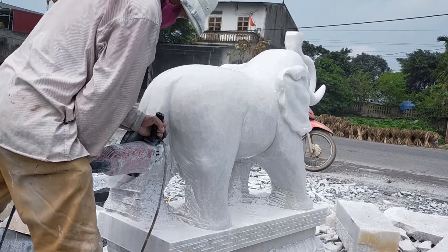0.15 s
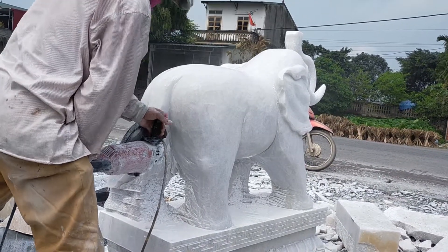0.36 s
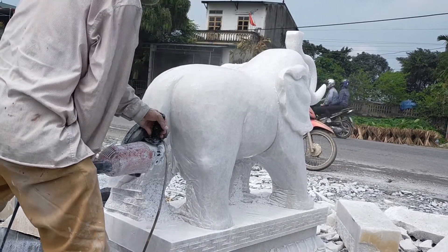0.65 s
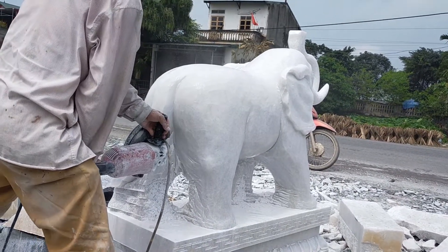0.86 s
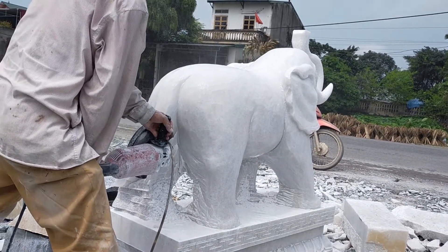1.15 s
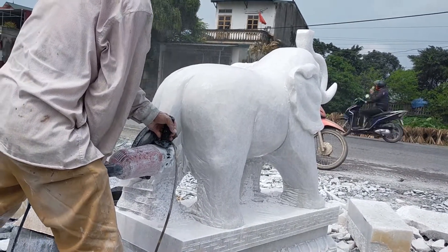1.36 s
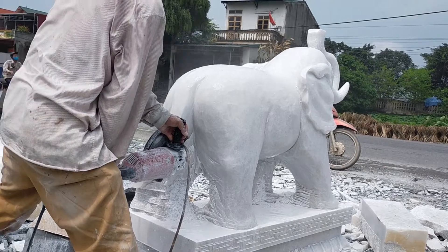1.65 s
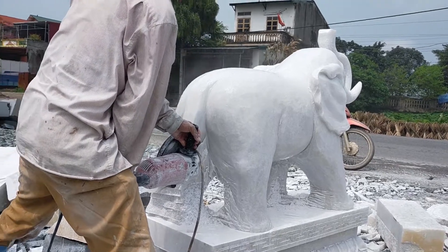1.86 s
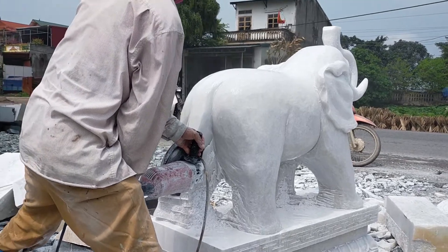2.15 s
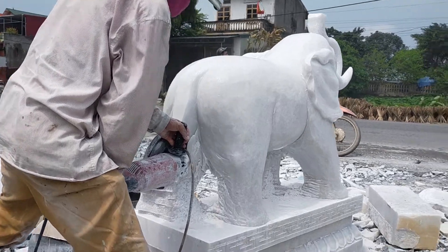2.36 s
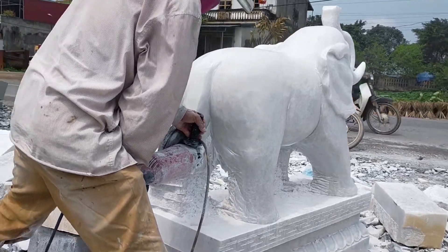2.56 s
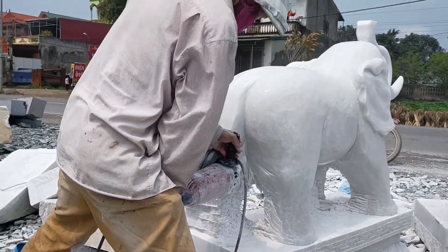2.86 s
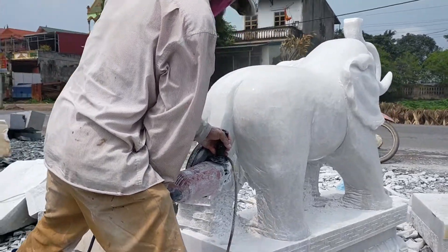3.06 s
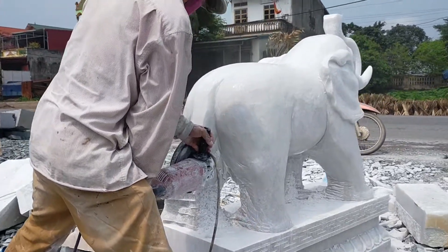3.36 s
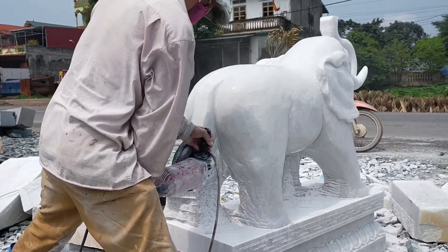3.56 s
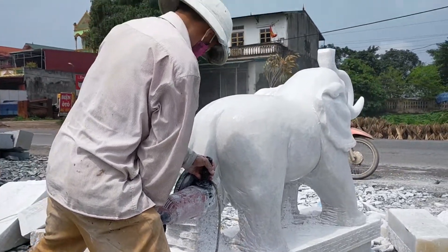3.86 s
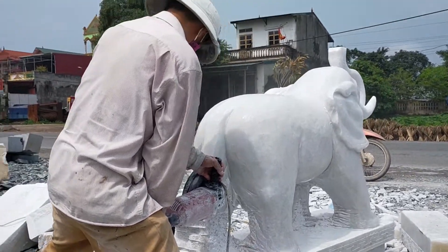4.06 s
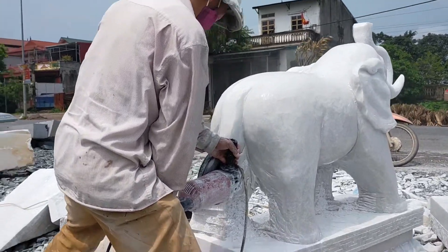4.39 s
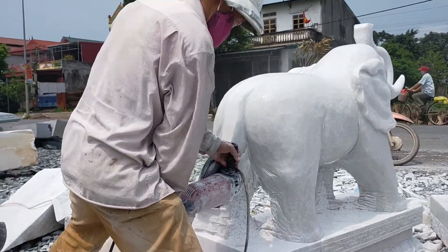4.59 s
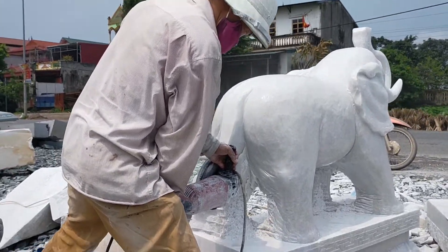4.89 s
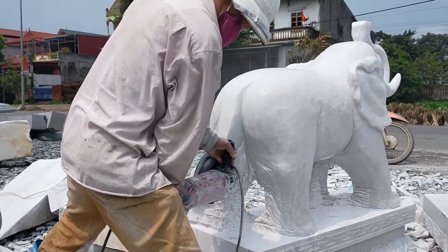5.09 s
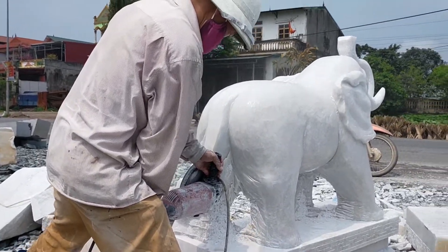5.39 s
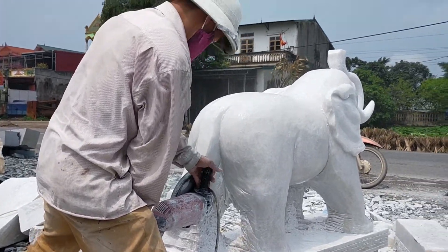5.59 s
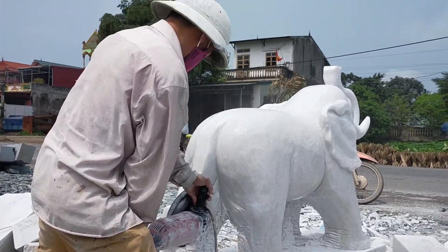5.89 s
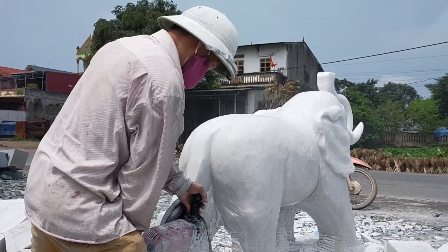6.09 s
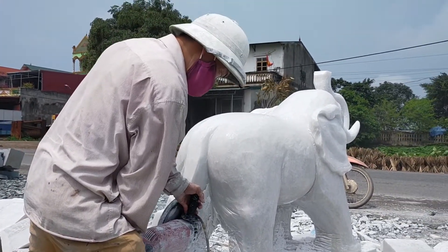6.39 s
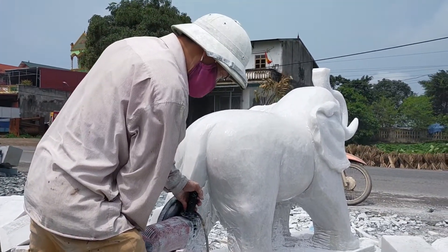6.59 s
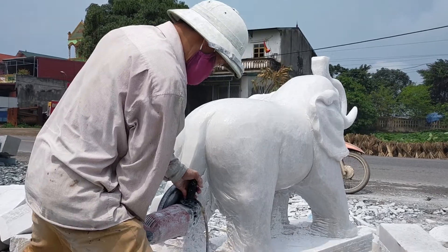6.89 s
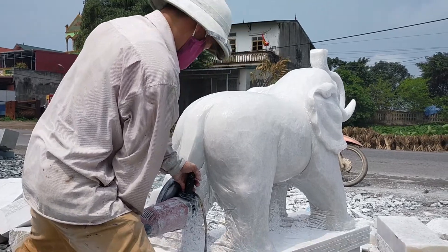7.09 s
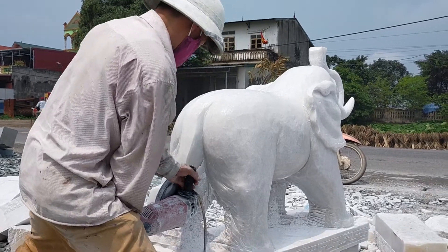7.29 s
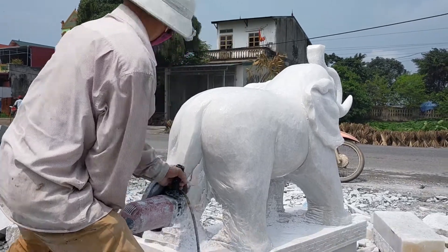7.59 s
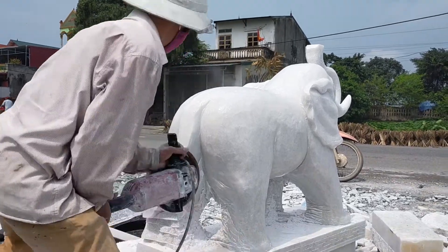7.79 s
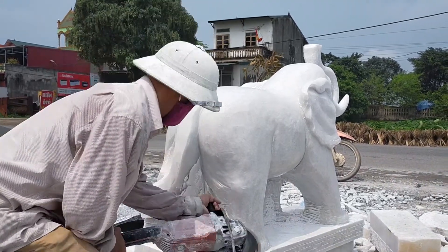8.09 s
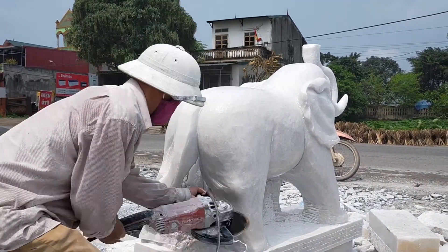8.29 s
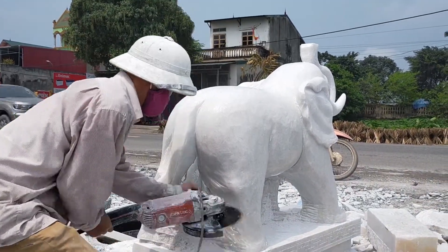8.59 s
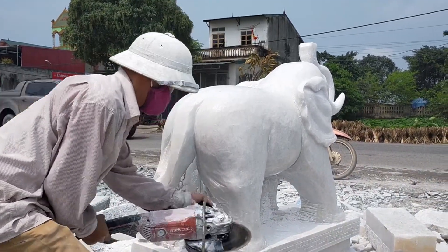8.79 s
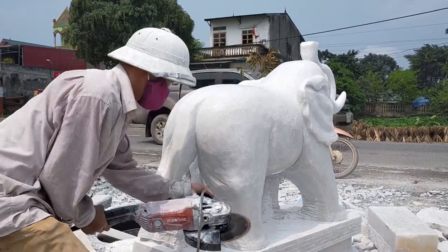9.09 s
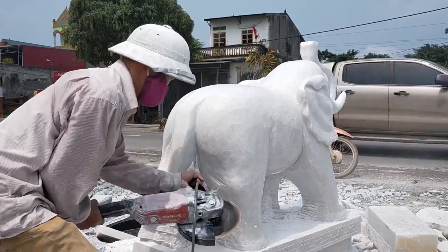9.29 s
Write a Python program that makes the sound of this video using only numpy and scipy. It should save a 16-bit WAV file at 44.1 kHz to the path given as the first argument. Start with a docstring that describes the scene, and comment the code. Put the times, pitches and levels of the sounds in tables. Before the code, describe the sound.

Outdoors, the steel disc of an angle grinder hisses steadily against stone, its thin metallic ring wavering and now and then sliding down in a brief whine. Wind keeps overloading the microphone, sometimes as separate thumps and sometimes as a rough rumbling rush. Toward the end, a vehicle engine drones faintly underneath and four short, bright ticks come through the grinding.

```python
"""Outdoors, an angle grinder cuts stone: grit hisses, the steel disc rings in a few moving bands.
Gusts of air overload the microphone, whose output jumps between levels: single thumps in a light
gust, a dense rush in a strong one. Near the end a few ticks sound and an engine drones on the road."""
import sys
import numpy as np
from scipy import signal
from scipy.io import wavfile
from scipy.ndimage import uniform_filter1d

SR = 44100
rng = np.random.default_rng(int(sys.argv[2]) if len(sys.argv) > 2 else 0)


def pcm_store(signal):
    """Save signal as 16-bit PCM."""
    levels = np.round(np.clip(np.atleast_2d(signal), -1, 1) * 32767)
    wavfile.write(sys.argv[1], SR, levels.astype(np.int16).T)


N = 416744


# disc on stone: (time [s], hiss level [dB], lowest ring [Hz])
CUT_PATH = [(0.0, -33, 4450), (0.7, -35, 4330), (1.4, -33.5, 4240), (1.97, -33, 3990), (2.5, -32.5, 4250),
            (2.8, -34.5, 4300), (3.5, -34, 4050), (3.9, -36, 3960), (4.15, -35, 4220), (4.7, -33, 4300),
            (5.15, -33, 4330), (5.6, -32.5, 4350), (6.4, -32, 4220), (7.1, -34, 4180), (7.55, -33, 4130),
            (7.62, -35, 4200), (8.0, -34.5, 4450), (8.3, -35, 4250), (8.72, -35, 4300), (9.2, -34.5, 4200),
            (9.45, -36.5, 4100)]
# shading as the tool turns: (time [s], treble gain [dB], mid gain [dB])
TOOL_SHADE = [(0, 3.5, -0.8), (2.5, 2.5, 0.6), (4.2, 3, 1.2), (4.5, 0, -0.2), (6.5, -3.5, -0.7),
              (7.55, -3, -0.5), (7.65, -4.5, -1.5), (9.2, -2, -1.5), (9.45, -2, 2)]

def grinder(overload):
    """Grit noise drives disc and housing; the disc runs slightly out of true and throbs once a turn."""
    cut_db, lowest_hz = curves(CUT_PATH)
    treble_db, mid_db = curves(TOOL_SHADE)
    bite_db = bites()
    hiss = grit() + faint_rings()
    treble, mid = band(hiss, 6660, 14000), band(hiss, 2150, 5800)
    hiss = hiss + (gain(treble_db) - 1) * treble + (gain(mid_db) - 1) * mid
    rings = tool_rings(lowest_hz, treble_db, bite_db, overload)
    tool = hiss * gain(cut_db + bite_db) + rings + whines()
    shaft_hz = 180.3 * (1 + 0.0102 * wander(0.72))
    throb = 1 + 0.041 * np.sin(2 * np.pi * np.cumsum(shaft_hz) / SR)
    return tool * throb * gain(0.84 * wander(8.3))


# grit and cooling air: (frequency [Hz], relative density [dB])
GRIT_SPECTRUM = [(18, -38), (30, -3), (693, -13), (1830, -2.5), (2030, -3), (2430, -2.5), (4110, 2.5),
                 (6580, -4.5), (8110, -4.5), (9490, -6), (11100, -7.5), (13300, -7), (15600, -18.5)]

def grit():
    """Noise through the disc's many small modes, which drift in and out as narrow streaks."""
    frames, bin_hz = N // 256 + 5, np.fft.rfftfreq(1024, 1 / SR)
    real, imag, streaks, patches = rng.standard_normal((frames, 513, 4)).T
    streaks = unit_rms(uniform_filter1d(uniform_filter1d(streaks, size=2, axis=0), size=40, axis=1))
    patches = unit_rms(uniform_filter1d(uniform_filter1d(patches, size=16, axis=0), size=20, axis=1))
    hz, db = np.transpose(GRIT_SPECTRUM)
    colour_db = np.interp(np.log(bin_hz + 1), np.log(hz), db)[:, None] + 2.4 * streaks + patches
    _, hiss = signal.istft((real + 1j * imag) * gain(colour_db), nperseg=1024, noverlap=768)
    return unit_rms(hiss[:N])


# (start [s], length [s], hiss boost [dB])
DISC_BITES = [(4.74, 0.06, 2), (5.05, 0.07, 0.5), (7.12, 0.089, 1), (7.95, 0.056, 4.5), (8.7, 0.078, 3),
              (9.344, 0.099, 4)]

def bites():
    """The disc bites in, swells and lets go abruptly: dB over the steady cut."""
    return sum(db * spell(start, length, rise_s=0.089, fall_s=0.0058) for start, length, db in DISC_BITES)


# upper disc modes: (frequency [Hz], width [Hz])
DISC_MODES = [(7920, 220), (9480, 230), (11080, 250), (14950, 840)]
# guard and housing modes: (frequency [Hz], width [Hz])
HOUSING_MODES = [(2080, 230), (2860, 210), (3320, 220), (4950, 470), (5850, 670), (7300, 170)]
# lowest ring, then disc, then housing: (rest level [dB], shade slope [dB/dB], bite slope [dB/dB])
MODE_RESPONSE = [(-50, 1, 3.5), (-49, 0.5, 1.5), (-55.5, 0, -12), (-52.5, 2, -12), (-45, -0.2, 1.5),
                 (-59, 0, 0.5), (-52, 0, 2), (-58.5, -0.5, 0.5), (-49, 1.5, 0.5), (-54.5, 1, 2),
                 (-53, 0.5, 4)]
# one ring sings out: (start [s], length [s], ring [Hz], boost [dB])
MODE_BOOSTS = [(0.0, 1.17, 7920, 7), (0.0, 1.9, 4950, 2.5), (0.0, 2.1, 5850, 8.5), (0.68, 0.16, 7920, 3.5),
               (0.0, 1.754, 2860, 9), (0.3, 0.33, 9480, 13), (0.45, 0.2, 11080, 4), (0.95, 0.35, 9480, 11),
               (1.85, 0.28, 4250, 10.5), (2.1, 0.22, 9480, 12), (2.5, 0.16, 4250, 11.5),
               (2.66, 0.19, 11080, 5), (3.399, 0.64, 4250, 6), (3.401, 1.07, 3320, 13),
               (3.401, 0.8, 2080, 11.5), (3.55, 0.95, 11080, 4), (4.72, 0.44, 4250, 8.5),
               (4.719, 0.39, 14950, 6), (4.72, 1.42, 7920, 5), (4.8, 0.9, 11080, 5.5),
               (5.5, 0.25, 7300, 11), (6.2, 0.38, 14950, 5), (6.9, 0.34, 14950, 5.5), (7.6, 0.27, 9480, 8),
               (8.03, 0.59, 9480, 9), (8.85, 0.36, 9480, 8)]

def tool_rings(lowest_hz, shade_db, bite_db, overload):
    """Disc, guard and housing resonate; a bite pushes the lowest ring up in pitch."""
    bite_hz_per_db, edge_s = 61.5, 0.069
    modes = [(lowest_hz + bite_hz_per_db * bite_db, 190)] + DISC_MODES + HOUSING_MODES
    out = np.zeros(N)
    for (hz, width_hz), (rest_db, per_shade, per_bite) in zip(modes, MODE_RESPONSE):
        mean_hz = np.mean(hz)
        db = rest_db + per_shade * shade_db + per_bite * bite_db
        for start, length, ring_hz, boost_db in MODE_BOOSTS:
            if abs(ring_hz / mean_hz - 1) < 0.06:
                db += boost_db * spell(start, length, edge_s, edge_s)
        if mean_hz < 6500:  # a strong gust drowns the lower rings
            db -= 10 * overload
        drifting_hz = hz * (1 + 0.004 * wander(3.2))
        out += gain(db + 0.83 * wander(13)) * ring(drifting_hz, width_hz)
    return out


# one list per whine: (time [s], frequency [Hz], level [dB])
WHINE_GLIDES = [
    [(2.25, 5310, -60), (2.32, 5260, -50), (2.5, 4952, -40), (2.6, 4790, -46.5), (2.7, 4700, -60)],
    [(7.8, 6150, -60), (7.88, 6100, -48), (8.0, 5996, -44), (8.1, 6005, -50), (8.2, 6000, -60)],
]

def whines():
    """Thin whines slide down as the disc bites."""
    return sum(gain(db) * ring(hz, width_hz=90) for hz, db in map(curves, WHINE_GLIDES))


# (frequency [Hz], width [Hz], level re hiss [dB])
FAINT_MODES = [(1434, 220, -20), (6420, 79, -32), (8320, 91, -22), (9850, 200, -27), (10570, 140, -20),
               (12450, 240, -25), (12250, 91, -27), (13600, 260, -24), (14200, 200, -21), (14900, 200, -19)]

def faint_rings():
    """Weak resonances waver within the hiss."""
    return sum(gain(db + 3 * wander(0.97)) * ring(hz * (1 + 0.004 * wander(2.5)), width_hz)
               for hz, width_hz, db in FAINT_MODES)


# (start [s], length [s], low-band level [dB], tilt: 500-1200 Hz re 25-250 Hz [dB])
WIND_GUSTS = [(0.0, 0.083, -38, -1), (0.12, 0.07, -38.5, -10), (0.25, 0.21, -34, -10),
              (0.47, 0.16, -36, -4), (0.63, 0.06, -44, -9), (0.73, 0.088, -52, -6), (0.93, 0.47, -35, -8),
              (1.47, 0.064, -41.5, -12), (1.562, 0.42, -34, -7), (2.079, 0.48, -35.5, -9),
              (2.661, 0.32, -35.5, -8), (3.054, 0.07, -41, -11.5), (3.2, 0.11, -35.5, -13),
              (3.33, 0.1, -40, -9), (3.558, 0.1, -52, -6), (4.082, 0.11, -54.5, -6), (4.2, 0.058, -49, -6),
              (4.259, 0.48, -36.5, -8), (4.783, 0.84, -36, -11), (5.65, 1.36, -37, -8),
              (7.02, 0.13, -40, -3), (7.18, 0.69, -36, -10), (8.06, 0.075, -46, -7),
              (8.118, 0.55, -35.5, -7), (8.847, 0.46, -37.5, -7)]

def wind():
    """Air on the capsule: low-band level and level-weighted tilt, both in dB."""
    calm_db, calm_tilt_db = -60, -12
    level = gain(calm_db)
    weighted_tilt = calm_tilt_db * level
    for start, length, db, tilt_db in WIND_GUSTS:
        gust = gain(db) * spell(start, length, rise_s=0.03, fall_s=0.07) ** 2
        level = level + gust
        weighted_tilt = weighted_tilt + tilt_db * gust
    return 20 * np.log10(level), weighted_tilt / level


# (start [s], length [s], added tilt [dB], rasp level [dB])
AIR_SURGES = [(0.5, 0.095, 4, -50), (1.13, 0.22, 2.5, -45), (1.771, 0.057, 6, -46.5),
              (2.246, 0.25, 10, -50), (2.827, 0.072, 7, -42), (4.351, 0.38, 12, -43), (5.12, 0.5, 10, -54),
              (5.769, 0.47, 11, -60.5), (6.2, 0.17, 5, -54.5), (6.378, 0.55, 11, -47),
              (7.23, 0.36, 12.5, -64), (8.198, 0.25, 3, -50), (8.931, 0.13, 3.5, -49)]

def surges():
    """Air surges inside a gust, a dense rush: added tilt in dB and rasp amplitude."""
    added_db, rasp_level = np.zeros(N), np.zeros(N)
    for start, length, tilt_db, rasp_db in AIR_SURGES:
        envelope = spell(start, length, rise_s=0.07, fall_s=0.03)
        added_db += tilt_db * envelope
        rasp_level += gain(rasp_db) * envelope
    return added_db, rasp_level


def capsule_overload(low_db, tilt_db):
    """0 in light air, 1 when a strong gust fills the capsule's range."""
    return np.clip((uniform_filter1d(low_db + tilt_db, size=3000) + 43.5) / 5, 0, 1)


def jump_rate(tilt_db):
    """Jumps per second: their spectrum is flat up to rate / pi, so a brighter gust jumps more often."""
    corner_hz = np.geomspace(8, 6000, num=60)
    mid_power = np.arctan(1200 / corner_hz) - np.arctan(500 / corner_hz)
    low_power = np.arctan(250 / corner_hz) - np.arctan(25 / corner_hz)
    return np.pi * np.interp(tilt_db, 10 * np.log10(mid_power / low_power), corner_hz)


def buffeting(low_db, tilt_db, rasp_level, overload):
    """The overloaded capsule flips polarity at random moments and sags back in between."""
    jumps_per_s = jump_rate(tilt_db) * gain(3 * wander(25) + 4 * overload)
    jump_count = np.cumsum(rng.random(N) < jumps_per_s / SR)
    polarity = (-1.) ** jump_count
    steps = polarity * gain(5.56 * rng.standard_normal(N + 1))[jump_count]
    kicks = np.diff(steps, prepend=0) * np.minimum(rng.exponential(1, N), 3)
    overshoot = 0.38 * signal.lfilter([1], [1, -0.88], kicks)
    eddies = gain(-14.5) * unit_rms(band(rng.standard_normal(N), 88, 1700))
    thumps = band(steps + overshoot, 5.9, 4930) + eddies
    thumps /= np.sqrt(uniform_filter1d(band(thumps, 17.3, 396) ** 2, size=5000) + 0.0034)
    rasp = band(band(polarity, 900, 6800), 1130, 6700)
    rasp /= np.sqrt(uniform_filter1d(rasp ** 2, size=5000) + 1e-4)
    flutter_db = 2 * (1 - overload) * wander(8.1)
    return thumps * gain(low_db + flutter_db) + rasp * rasp_level


# (time [s], impulse level [dB])
CAPSULE_POPS = [(0.547, -28), (1.195, -29), (1.348, -19.5), (1.711, -14), (2.111, -23.5), (2.191, -17),
                (2.287, -20), (2.747, -16), (2.843, -20), (3.38, -17.5), (4.327, -25), (4.811, -19),
                (5.156, -20), (5.697, -17), (5.788, -18), (6.64, -22), (7.121, -19), (7.722, -18),
                (8.133, -24), (8.445, -18), (8.861, -21), (9.052, -13), (9.141, -18)]

def pops():
    """The capsule's hardest single jumps: a spike, then a sag back to rest."""
    t, impulses = np.arange(3000) / SR, np.zeros(N)
    for (start, db), sign in zip(CAPSULE_POPS, rng.choice([-1., 1.], len(CAPSULE_POPS))):
        impulses[round(start * SR)] = sign * gain(db)
    spike, sag = np.exp(-t / 0.00015), 0.5 * np.exp(-t / 0.0071)
    return band(signal.oaconvolve(impulses, spike + sag)[:N], 7, 4200)


# (time [s], impulse level [dB])
TICK_HITS = [(8.2571, -28), (8.552, -23.5), (8.8622, -26), (9.1755, -33)]

def ticks():
    """Short bright noise bursts, about three a second."""
    t, impulses = np.arange(1500) / SR, np.zeros(N)
    for start, db in TICK_HITS:
        impulses[round(start * SR)] = gain(db)
    burst = (1 - np.exp(-t / 0.002)) * np.exp(-t / 0.0064)
    envelope = signal.oaconvolve(impulses, burst)[:N]
    return envelope * unit_rms(band(rng.standard_normal(N), 2800, 4660))


# (time [s], frequency [Hz], level [dB])
ENGINE_HUM = [(7.3, 118.7, -72), (7.9, 123.3, -59), (8.7, 115.7, -58), (9.45, 120.8, -56)]

def engine():
    """An engine on the road: a narrow wavering hum."""
    hz, db = curves(ENGINE_HUM)
    audible = np.arange(N) > ENGINE_HUM[0][0] * SR
    return gain(db) * audible * ring(hz, width_hz=12)


def ring(hz, width_hz):
    """Noise-driven resonance, rms 1: slow complex noise shifted up to hz."""
    hop = 6
    poles = np.exp(-np.pi * width_hz * np.array([1, 3]) * hop / SR)
    noise = rng.standard_normal((N // hop + 2, 2)) @ [1, 1j]
    slow = signal.lfilter([1], np.poly(poles), noise)
    slow = np.interp(np.arange(N) / hop, np.arange(len(slow)), slow)
    phase = 2 * np.pi * np.cumsum(hz * np.ones(N)) / SR
    return unit_rms(abs(slow) * np.cos(phase + np.angle(slow)))


def wander(corner_hz):
    """Slow random drift, rms 1."""
    hop = 128
    pole = np.exp(-2 * np.pi * corner_hz * hop / SR)
    drift = signal.lfilter([1], [1, -pole], rng.standard_normal(N // hop + 2))
    return unit_rms(np.interp(np.arange(N) / hop, np.arange(len(drift)), drift))


def spell(start, length, rise_s, fall_s):
    """Trapezoid gate, ramps centred on start and end."""
    corners_s = np.array([-rise_s / 2, rise_s / 2, max(length - fall_s / 2, rise_s / 2), length + fall_s / 2])
    return np.interp(np.arange(N) / SR, start + corners_s, [0, 1, 1, 0])


def curves(rows):
    """One per-sample curve for each column after time."""
    times_s, *columns = np.transpose(rows)
    return [np.interp(np.arange(N) / SR, times_s, column) for column in columns]


def band(x, lo_hz, hi_hz):
    """Butterworth band-pass."""
    return signal.sosfilt(signal.butter(2, [lo_hz, hi_hz], "bandpass", fs=SR, output="sos"), x)


def gain(db):
    """dB to amplitude."""
    return 10 ** (np.asarray(db) / 20)


def unit_rms(x):
    """Scale to rms 1."""
    return x / np.sqrt(np.mean(x ** 2) + 1e-20)


def scene():
    """One microphone on both channels; wind noise saturates at the end of the capsule's swing."""
    swing_limit = 0.17
    low_db, tilt_db = wind()
    surge_db, rasp_level = surges()
    tilt_db += surge_db
    overload = capsule_overload(low_db, tilt_db)
    swing = buffeting(low_db, tilt_db, rasp_level, overload) + pops()
    capsule = swing_limit * np.tanh(swing / swing_limit)
    return np.tile(grinder(overload) + capsule + ticks() + engine(), (2, 1))


def record(dry):
    """Steep low-pass band limit."""
    cutoff_hz = 15760
    taps = signal.firwin(1023, cutoff_hz, window=("kaiser", 10), fs=SR)
    return signal.oaconvolve(dry, taps[None], "same")


dry = scene()
out = record(dry)
pcm_store(out)
```